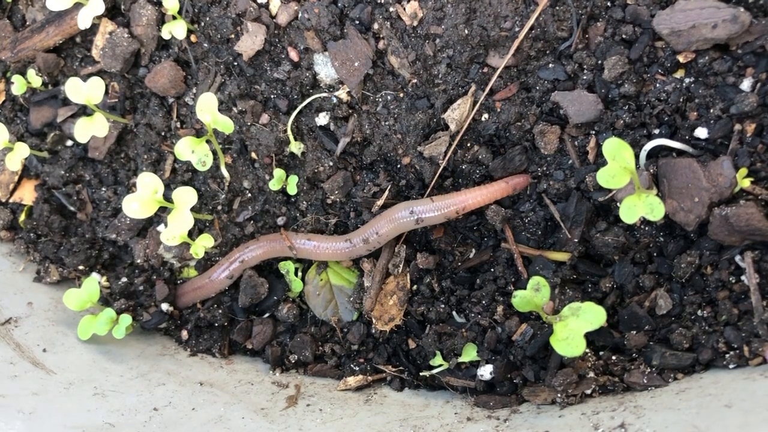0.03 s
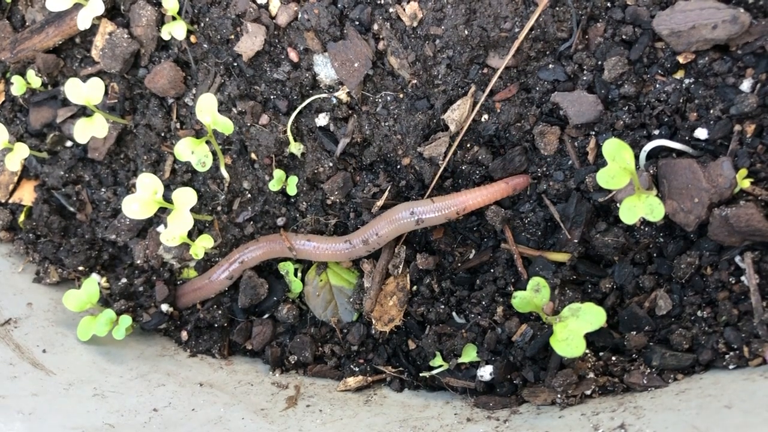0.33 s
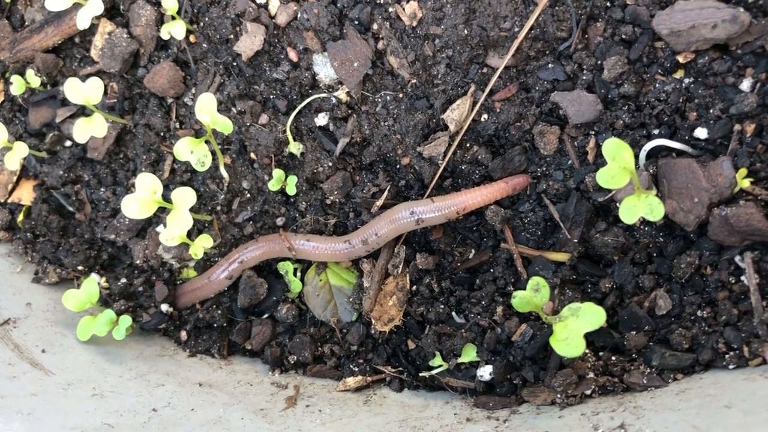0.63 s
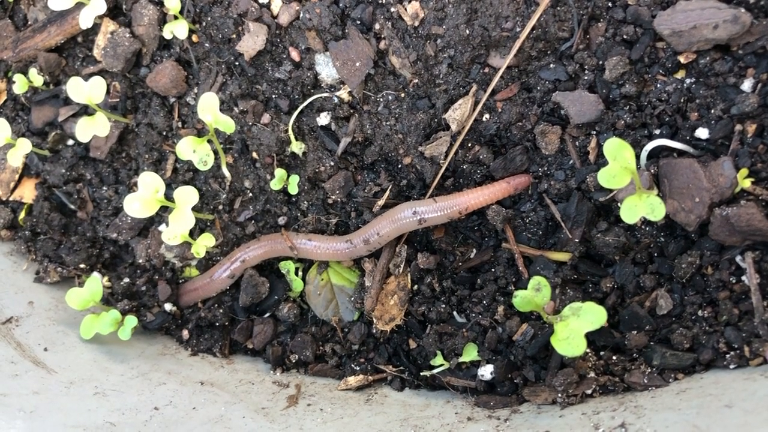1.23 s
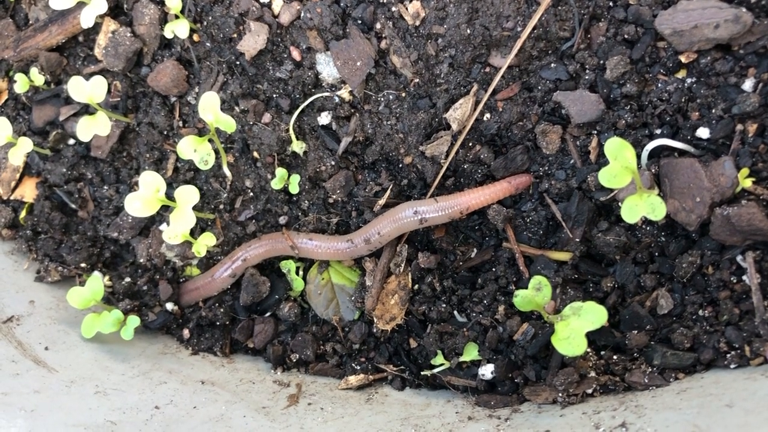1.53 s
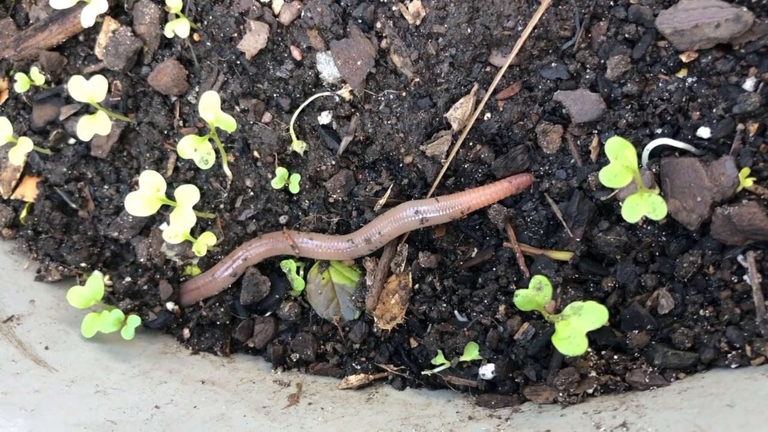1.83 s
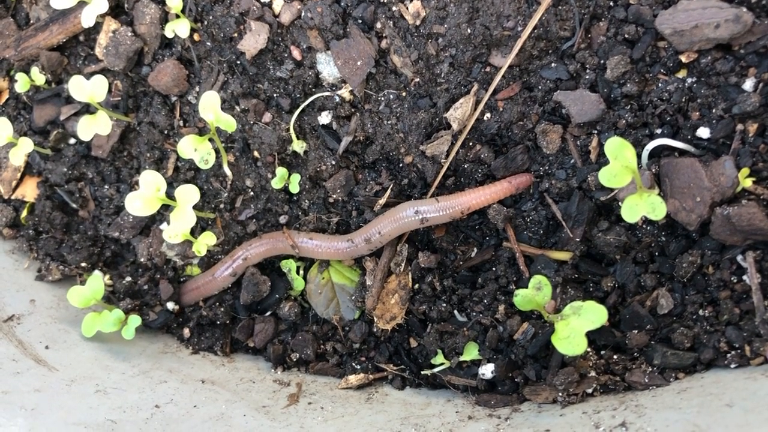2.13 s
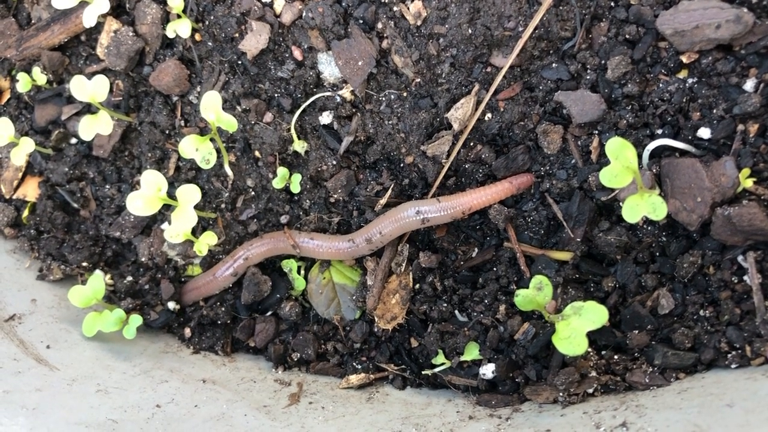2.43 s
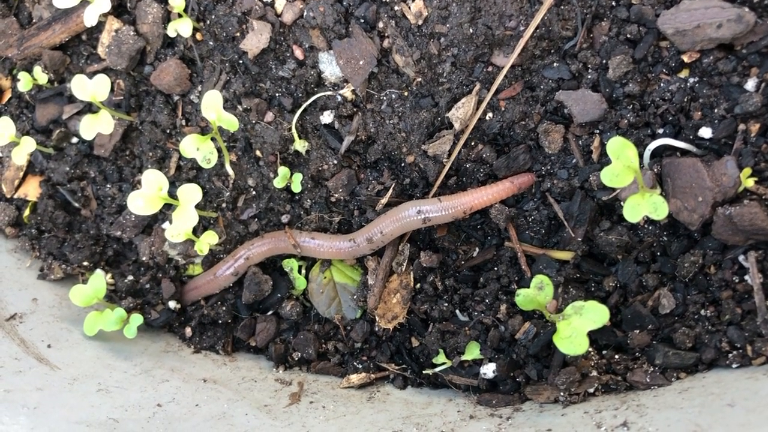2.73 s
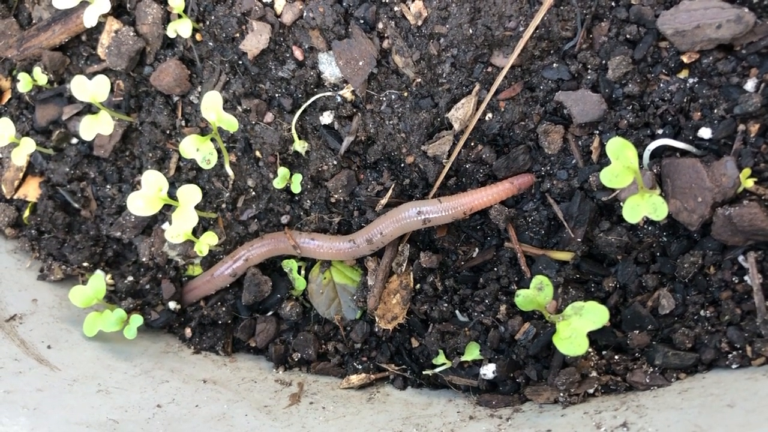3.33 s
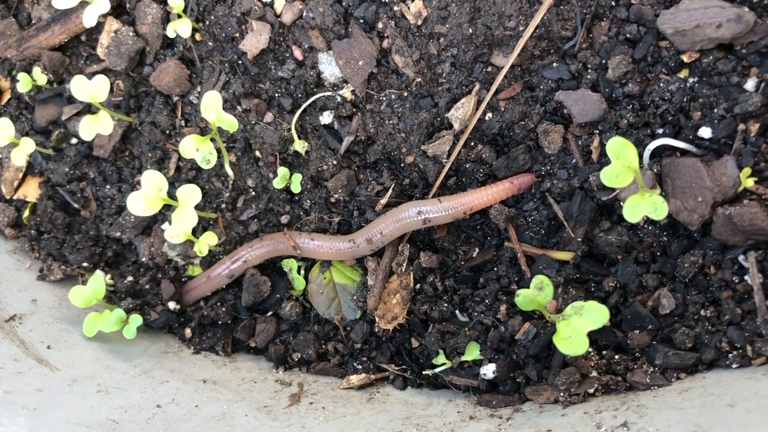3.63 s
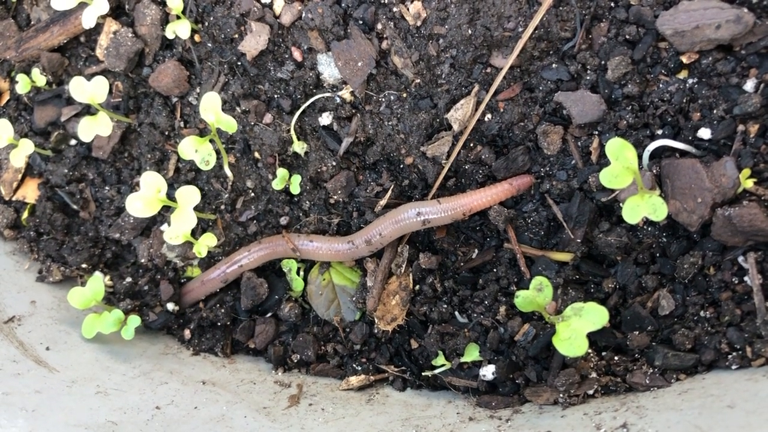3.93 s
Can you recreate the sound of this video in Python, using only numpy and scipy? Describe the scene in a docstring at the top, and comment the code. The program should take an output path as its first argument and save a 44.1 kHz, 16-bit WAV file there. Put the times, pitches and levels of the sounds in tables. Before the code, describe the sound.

A low, far-off motor hum dips, then swells above faint outdoor rumble and hiss. Tiny ticks come from damp soil just below the microphone, while a few faint distant hoots sound before the hum grows.

```python
"""A quiet garden, just above a pot of damp soil

A distant motor hums near 119 Hz and swells as it slows a little. Behind it lie thin whines
of far machinery, a low rumble and a fine hiss. Crumbs of soil tick faintly as they shift,
a few soft hoots echo from far off, and a faint rush swells towards the end."""
import sys
import numpy as np
from scipy import signal
from scipy.fft import rfft, irfft
from scipy.io import wavfile

SR = 44100
rng = np.random.default_rng(int(sys.argv[2]) if len(sys.argv) > 2 else 0)


def put_to_file(sound):
    """Save the sound as 16-bit audio at rate SR, in the file named by the first command-line argument."""
    columns = np.atleast_2d(sound).T  # one column per channel
    safe = np.clip(columns, -1, 1)
    whole_steps = np.round(safe * 32767)
    wavfile.write(sys.argv[1], SR, whole_steps.astype(np.int16))


N = 176400


def from_db(db):
    """Turn decibels into a number to multiply a sound by."""
    return 10 ** (np.asarray(db) / 20)


def rms_one(x):
    """Scale a signal so that its average strength (rms) is 1."""
    return x / np.sqrt(np.mean(x ** 2) + 1e-20)


def in_time(rows):
    """Join (time, value) points with straight lines, giving one value per sample."""
    return np.interp(np.arange(N) / SR, *np.transpose(rows))


def drift(rate_hz):
    """A smooth random wander, about 1 in size; a higher rate makes it quicker."""
    step, warm_up = 40, 2000  # samples per random value, values skipped at the start
    decay = np.exp(-2 * np.pi * step * rate_hz / SR)
    noise = rng.standard_normal(N // step + warm_up + 2)
    smooth = signal.lfilter([1], [1, -2 * decay, decay * decay], noise)[warm_up:]
    return np.interp(np.arange(N) / step, np.arange(len(smooth)), rms_one(smooth))


def resonate(x, hz, width_hz):
    """Make a sound ring at one pitch; the narrower the width, the longer it rings."""
    decay = np.exp(-np.pi * width_hz / SR)
    feedback = [1, -2 * decay * np.cos(2 * np.pi * hz / SR), decay * decay]
    return signal.lfilter([1, 0, -1], feedback, x + 1e-18)


def motor():
    """A far motor hums, with a weak tone an octave up; both waver on their way here."""
    # the motor's speed, heard as the pitch of its hum: t/s, f/Hz
    hum_pitch = [(0, 121.3), (.44, 119.6), (1.0, 119.7), (2.2, 119.3), (2.8, 119.0), (3.3, 118.9),
                 (4, 118.2)]
    # how loud the hum is: t/s, level/dB
    hum_level = [(0, -49.5), (.45, -52), (.75, -54), (1.25, -54), (1.55, -49), (1.85, -50.5), (1.97, -47),
                 (2.15, -45.5), (2.5, -43.5), (3.4, -42.5), (4, -43.5)]
    # how loud the octave is: t/s, level/dB
    octave_level = [(0, -77), (.3, -79.5), (.55, -68), (1.1, -70.5), (1.5, -76), (2.0, -64), (3.1, -66.5),
                    (4, -66)]
    hum_waver_db, octave_waver_db = 0.31, 0.4
    phase = 2 * np.pi * np.cumsum(in_time(hum_pitch)) / SR
    hum = from_db(in_time(hum_level) + hum_waver_db * drift(rate_hz=5)) * np.sin(phase)
    octave = from_db(in_time(octave_level) + octave_waver_db * drift(rate_hz=5)) * np.sin(2 * phase)
    return np.sqrt(2) * (hum + octave)  # so that the levels are rms


def whines():
    """Far machinery makes thin, unsteady tones barely above the hiss."""
    # the narrow bands of noise that whine: f/Hz, width/Hz, level/dB
    tones = [(998, 4, -88), (1040, 4, -88), (2433, 8, -100), (9040, 60, -103)]
    return sum(from_db(db) * rms_one(resonate(rng.standard_normal(N), hz, width_hz))
               for hz, width_hz, db in tones)


def air():
    """Distant rumble and hiss grow very slightly; each octave flickers a little on its own."""
    # how strong the noise is from low to high: f/Hz, level/dB in a band 1 Hz wide
    spectrum = [(20, -113), (30, -101), (45, -91), (62, -81.5), (100, -83.5), (160, -84), (230, -91.5),
                (330, -93.5), (460, -99), (650, -100.5), (820, -104), (1050, -103.7), (1400, -109),
                (2200, -115), (5000, -120.2), (12500, -127.2), (16000, -126.7)]
    flicker_db, rise_db_per_s = 0.34, 0.08
    hz = np.maximum(np.arange(N // 2 + 1) * SR / N, 1)
    points_hz, points_db = np.transpose(spectrum)
    shape = from_db(np.interp(np.log(hz), np.log(points_hz), points_db))
    noise = rfft(rng.standard_normal(N)) * np.sqrt(SR / 2) * shape
    octave = np.floor(np.log2(np.maximum(hz, 20)))
    bands = sum(irfft(noise * (octave == k), N) * from_db(flicker_db * drift(rate_hz=3.6))
                for k in np.unique(octave))
    return bands * from_db(rise_db_per_s * (np.arange(N) - N / 2) / SR)


def soil():
    """Shifting crumbs make tiny bright ticks: a few clear ones among fainter random ones."""
    # the clear ticks: t/s, peak level/dB
    ticks = [(.78, -72), (.841, -66), (.997, -68), (1.052, -66), (1.2851, -57), (1.7695, -67),
             (2.1272, -66), (2.480, -63.5)]
    crumbs_per_s, crumb_db = 5, -77
    crumb_moves = rng.random(N) < crumbs_per_s / SR
    clicks = crumb_moves * from_db(crumb_db) * rng.standard_normal(N)
    for start, db in ticks:
        clicks[int(start * SR)] += from_db(db)
    return resonate(clicks, hz=10500, width_hz=7300)


def hoots():
    """Soft, slightly hoarse hoots slide in pitch, blurred by scattered outdoor echoes."""
    # the far hoots: start t/s, length/s, first f/Hz, last f/Hz, level/dB
    notes = [(1.294, 0.085, 595, 618, -74), (1.345, 0.11, 625, 718, -70), (1.632, .07, 650, 680, -71),
             (1.707, 0.091, 654, 642, -68.5), (1.79, 0.093, 665, 636, -70.5)]
    fade_s, hoarse_hz = 0.021, 24
    echo_s, echo_db = 0.25, -3.5  # the echoes die away by 60 dB in echo_s
    t, calls = np.arange(N) / SR, np.zeros(N)
    for start, length, from_hz, to_hz, db in notes:
        fade = np.clip(np.minimum(t - start, start + length - t) / fade_s, 0, 1)
        slide = np.interp(t, [start, start + length], [from_hz, to_hz])
        pitch = slide + hoarse_hz * drift(rate_hz=60)
        calls += from_db(db) * fade * np.sin(2 * np.pi * np.cumsum(pitch) / SR)
    tail = rng.standard_normal(SR) * from_db(-60 * t[:SR] / echo_s)
    echoes = signal.fftconvolve(calls, tail / np.linalg.norm(tail))[:N]
    return calls + from_db(echo_db) * echoes


def rush():
    """A broad, faint rush of far-off noise swells towards the end."""
    peak_db, peak_s, spread_s = -83, 3.7, 0.6
    swell = np.exp(-((np.arange(N) / SR - peak_s) / spread_s) ** 2)
    noise = rms_one(resonate(rng.standard_normal(N), hz=1700, width_hz=1100))
    return from_db(peak_db) * swell * noise


def scene():
    """Add all the garden's sounds together in one channel."""
    return (motor() + whines() + air() + soil() + hoots() + rush())[None]


def record(dry):
    """Cut away the very highest treble with a steep filter."""
    cutoff_hz = 15700
    return signal.sosfilt(signal.ellip(12, .1, 70, cutoff_hz, fs=SR, output="sos"), dry)


dry = scene()
out = record(dry)
put_to_file(out)
```